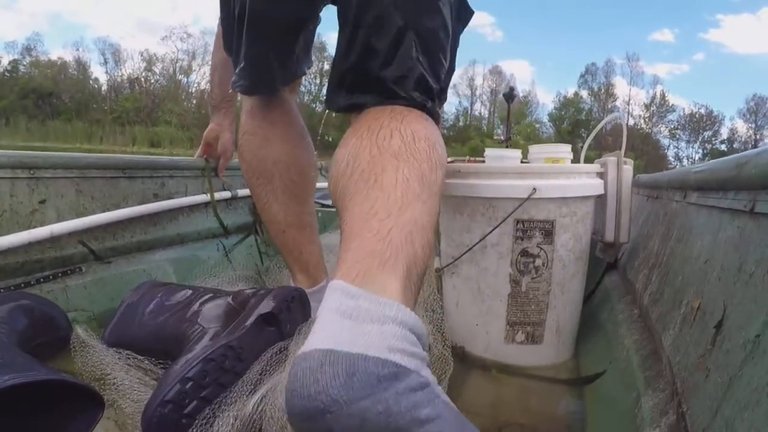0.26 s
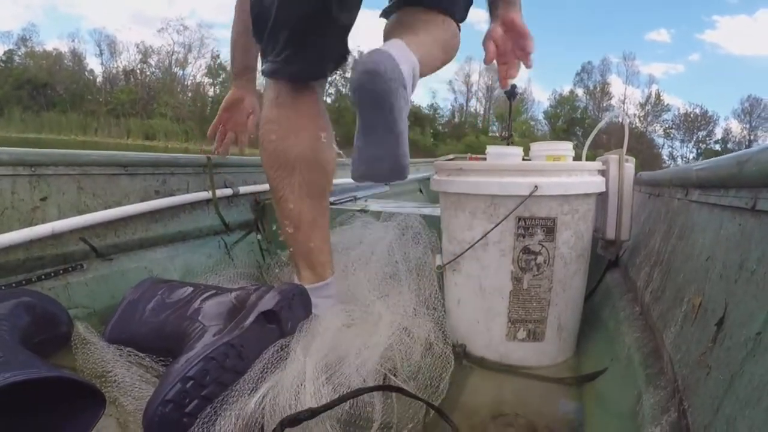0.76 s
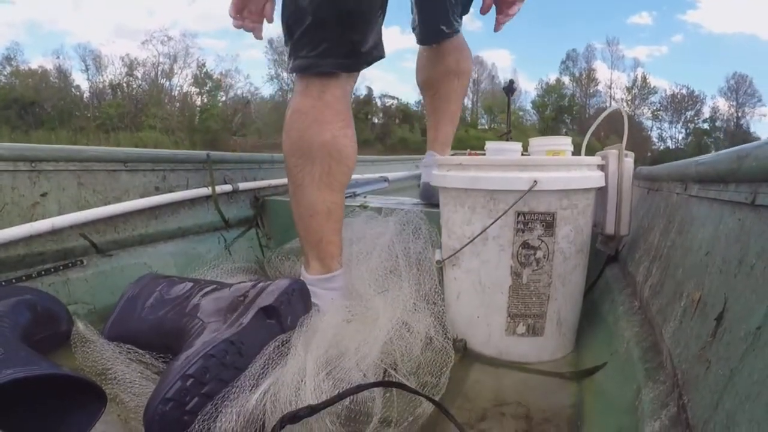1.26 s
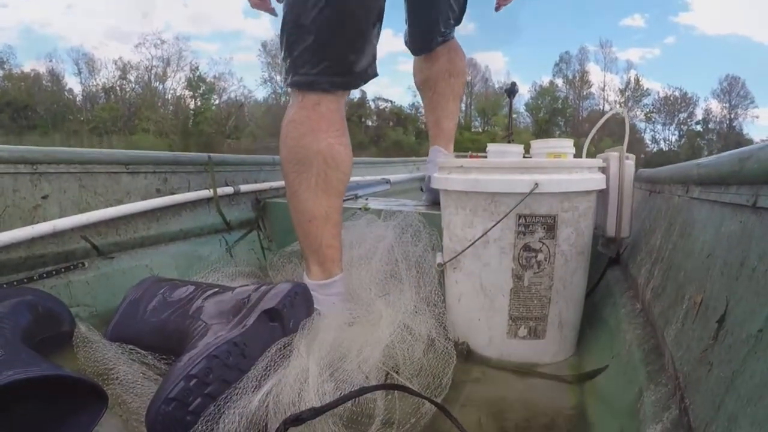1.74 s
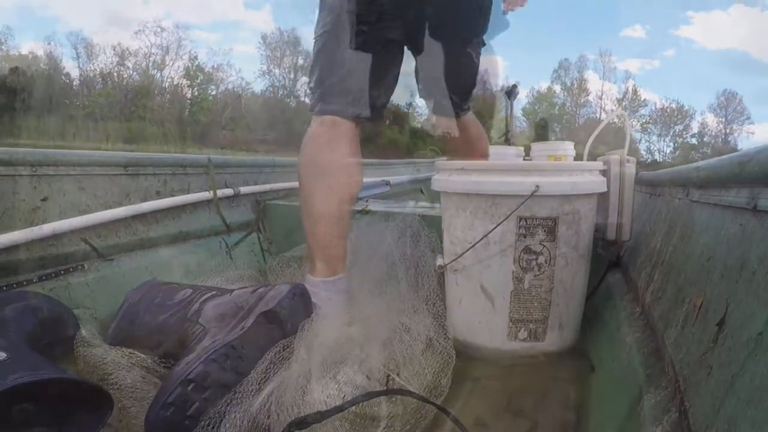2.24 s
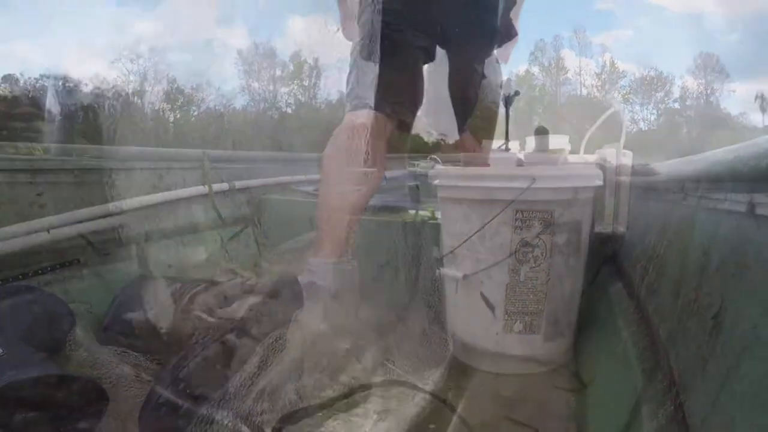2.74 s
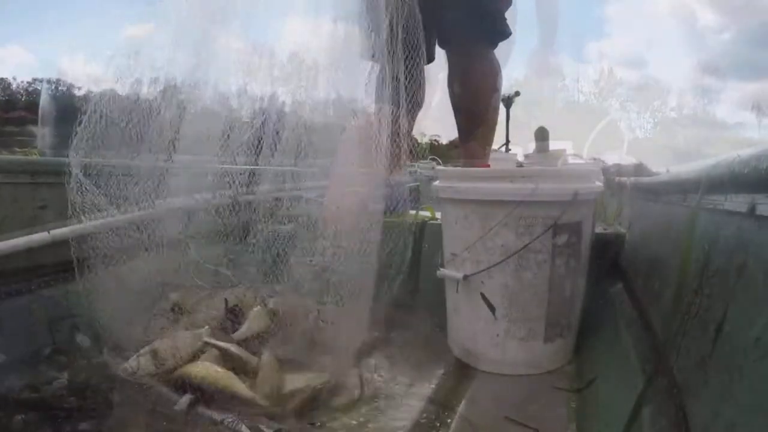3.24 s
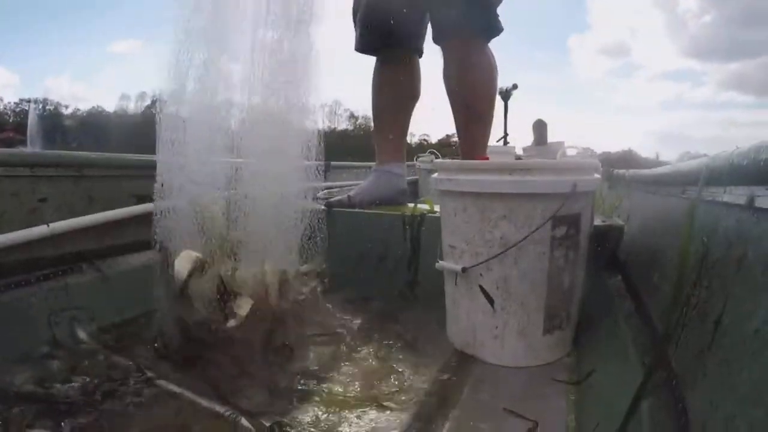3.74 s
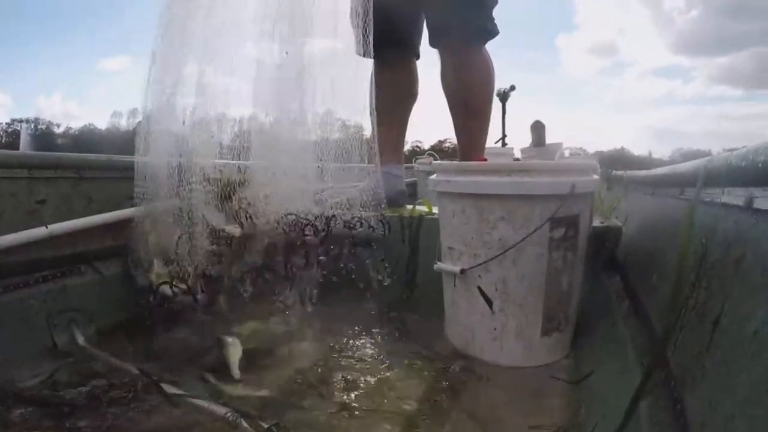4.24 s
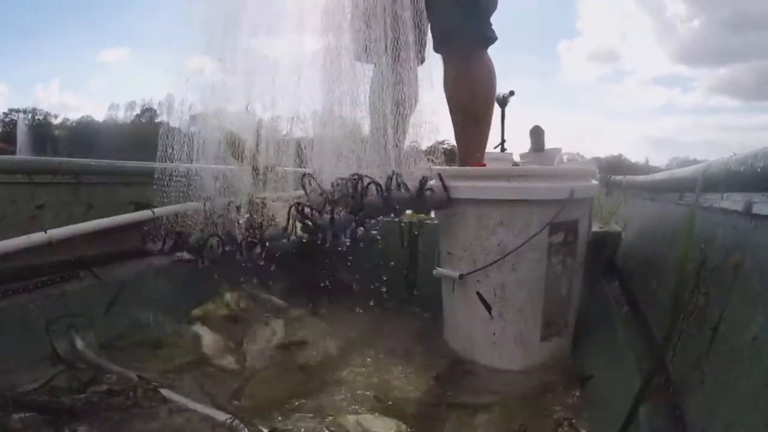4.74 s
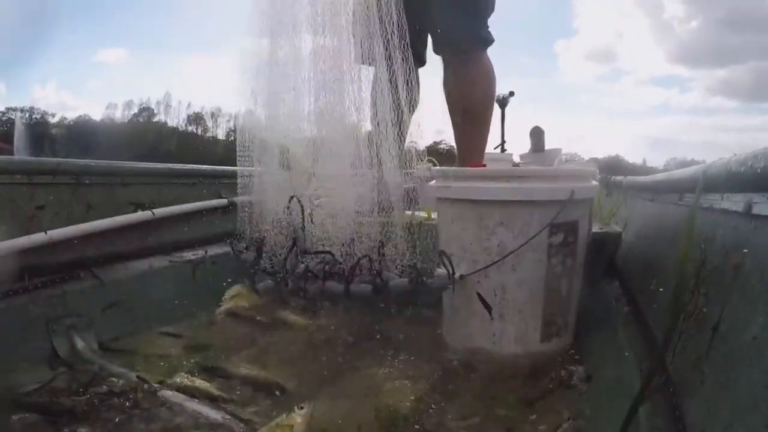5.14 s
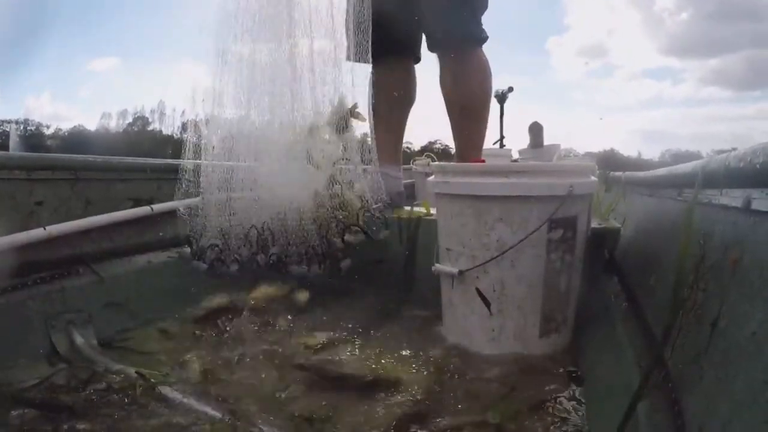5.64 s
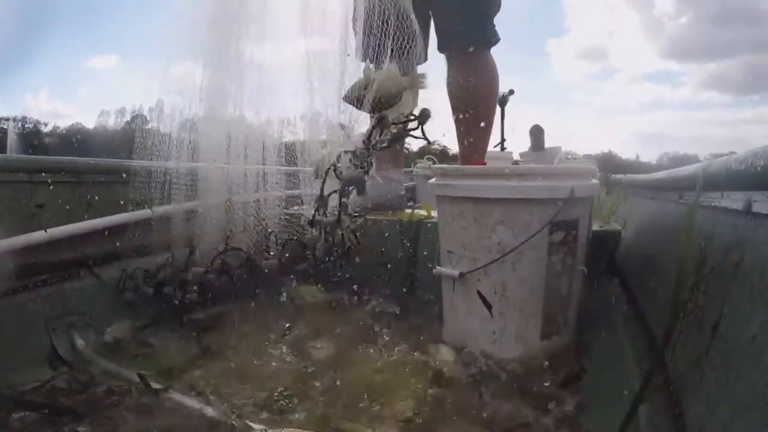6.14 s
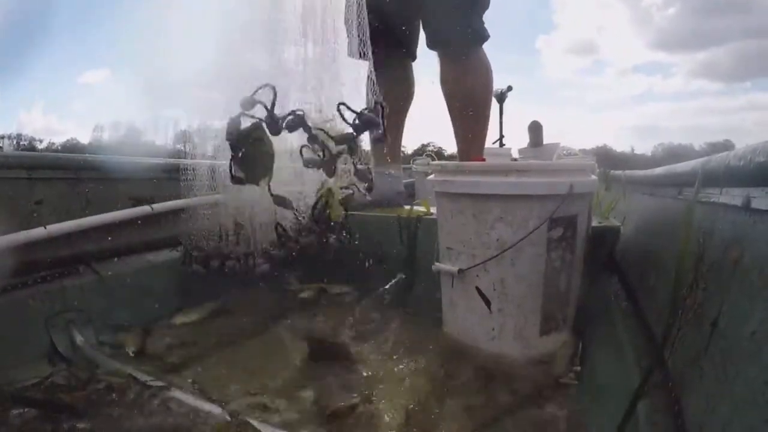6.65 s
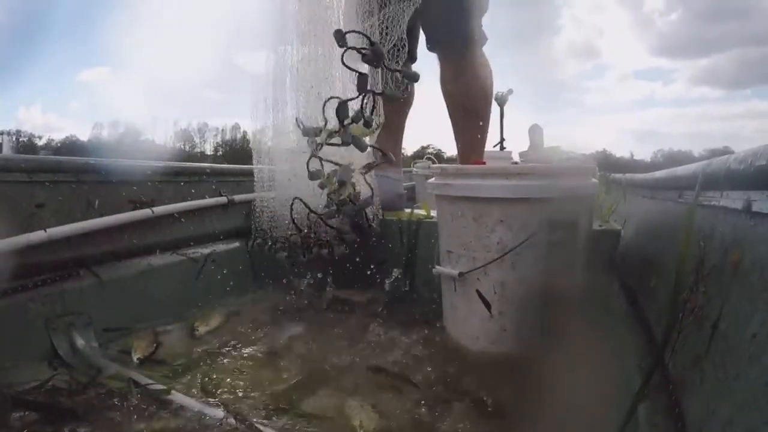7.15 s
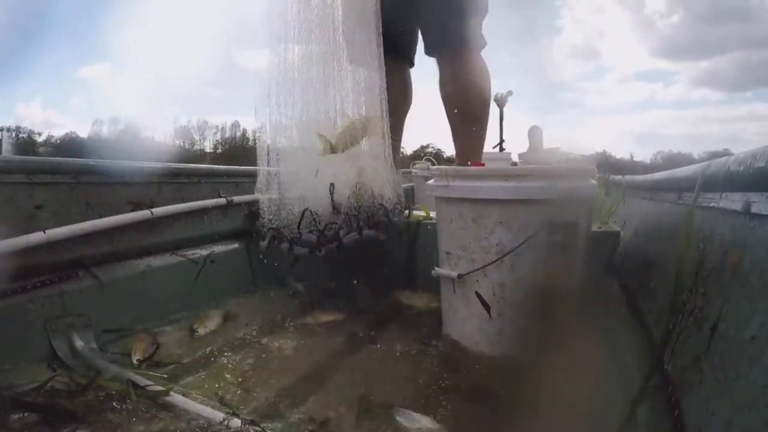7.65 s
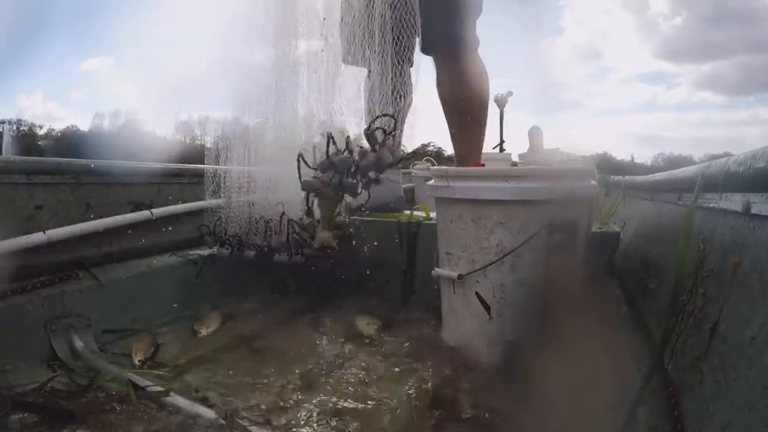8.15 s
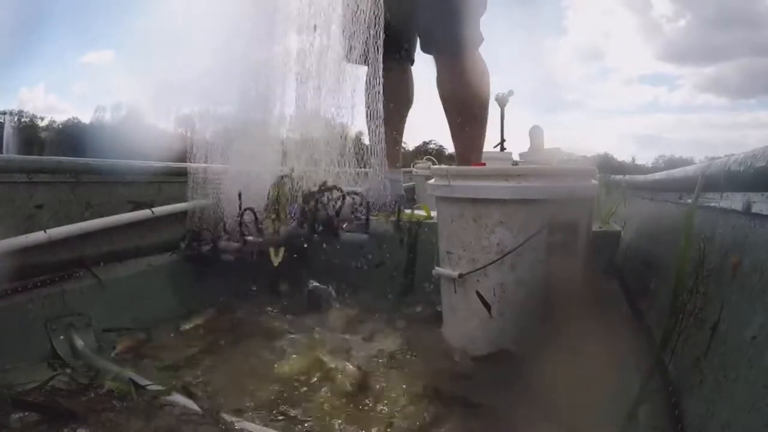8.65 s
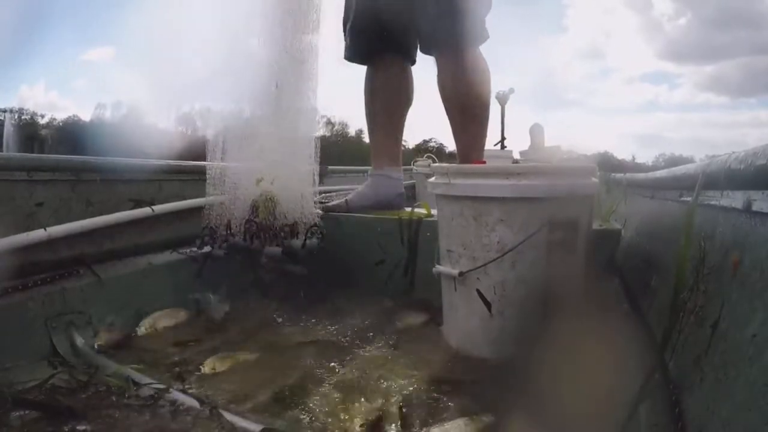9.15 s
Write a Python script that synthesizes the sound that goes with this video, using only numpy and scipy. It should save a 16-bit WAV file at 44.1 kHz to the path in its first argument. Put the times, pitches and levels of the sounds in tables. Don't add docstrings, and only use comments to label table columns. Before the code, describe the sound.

Wet net shaken in a small metal boat: lead weights and fish knock the hull, slap bilge water, and spray drips over a light breeze.

```python
import sys
import numpy as np
from scipy import signal
from scipy.fft import rfft, irfft, next_fast_len
from scipy.io import wavfile

SR = 44100
rng = np.random.default_rng(int(sys.argv[2]) if len(sys.argv) > 2 else 0)


def master(y):
    cut = np.clip(np.atleast_2d(y).T, -1, 1)
    pcm = np.round(cut * 32767)
    wavfile.write(sys.argv[1], SR, pcm.astype(np.int16))


def makeup_ratio(level_db):
    decades = np.asarray(level_db, float) / 20
    return 10 ** decades


N = 414099


def in_time(rows):
    s, *columns = np.transpose(rows)
    return [np.interp(np.arange(N) / SR, s, c, left=c[0], right=c[-1]) for c in columns]


def rms_one(x):
    return x / np.sqrt(np.mean(x ** 2) + 1e-20)


def colour(x, spectrum):
    size = next_fast_len(N)
    hz = np.maximum(np.arange(size // 2 + 1) * SR / size, 1)
    point_hz, point_db = np.transpose(spectrum)
    gain = makeup_ratio(np.interp(np.log(hz), np.log(point_hz), point_db))
    return rms_one(irfft(rfft(x, size) * gain, size)[:N])


def band(x, low_hz, high_hz):
    return rms_one(signal.sosfilt(signal.butter(2, [low_hz, high_hz], "band", fs=SR, output="sos"), x))


def muffle(x):
    return signal.sosfilt(signal.butter(3, 6800, fs=SR, output="sos"), x)


def drift(rate):
    every, warm_up = 40, 2000
    r = np.exp(-2 * np.pi * rate * every / SR)
    chance = rng.standard_normal(N // every + warm_up + 2)
    slow = signal.lfilter([1], [1, -2 * r, r * r], chance)[warm_up:]
    return np.interp(np.arange(N) / every, np.arange(len(slow)), rms_one(slow))


def ring(clicks, hz, t60):
    r, w = makeup_ratio(-60 / (t60 * SR)), 2 * np.pi * hz / SR
    return signal.lfilter([0, np.sin(w)], [1, -2 * r * np.cos(w), r * r], clicks + 1e-18)


def strikes(seconds, level_db):
    clicks = np.zeros(N)
    clicks[np.minimum((np.asarray(seconds) * SR).astype(int), N - 1)] = makeup_ratio(level_db)
    return clicks


def burst(clicks, rise_s, t60):
    up, down = np.exp(-1 / (rise_s * SR)), makeup_ratio(-60 / (t60 * SR))
    return signal.lfilter([1 - up], np.convolve([1, -up], [1, -down]), clicks + 1e-18)


def spells(rows, edge_s):
    t, level = np.arange(N) / SR, 0
    for s, length, db in rows:
        corners = s + np.array([-0.22, 0.68, -0.62, 0.22]) * edge_s + [0, 0, length, length]
        level = level + makeup_ratio(db) * np.interp(t, corners, [0, 1, 1, 0])
    return level


def grains(per_s, spread_db):
    sizes = makeup_ratio(spread_db * np.minimum(rng.exponential(1, N), 5)) * rng.choice([-1, 1], N)
    return sizes * (rng.random(N) < per_s / SR)


def droplets(per_s, spread_db, low_hz, high_hz, cycles):
    clicks, dealt = grains(per_s, spread_db), rng.integers(0, 10, N)
    out = np.zeros(N)
    for k, hz in enumerate(np.geomspace(low_hz, high_hz, 10)):
        once = ring(clicks * (dealt == k), hz, cycles / hz)
        out += hz * ring(once, hz, cycles / hz)
    return rms_one(out)


def bubbles(count, spread_db):
    out, longest = np.zeros(N), np.arange(int(.03 * SR)) / SR
    for when, pitch, size, climb in rng.random((count, 4)):
        at, hz = int(when * (N - len(longest))), 650 * 8.5 ** pitch
        t = longest[:int(24 * SR / hz)]
        life = t * hz / 25.1
        chirp = np.sin(2 * np.pi * hz * t * (1 + 0.26 * climb * life))
        out[at:at + len(t)] += makeup_ratio(-spread_db * np.log(size + 0.034)) * chirp * life * makeup_ratio(-60 * life)
    return rms_one(out)


def wet_noise():
    # frequency in Hz, density in dB per Hz.
    through_housing = [(350, 9), (600, -4.5), (907, -10.5), (996, -6.5), (1370, -4.5), (1670, 1),
                       (3150, -16), (4050, -10), (5060, -12), (6180, -11.5), (7060, -23.5), (8400, -26.5),
                       (14500, -63)]
    spatter = rng.standard_normal(N)
    return colour(spatter * np.abs(spatter) ** 0.8, through_housing)


def patchy(noise, low_hz, high_hz, gush, own_db, rate):
    edges = np.geomspace(low_hz, high_hz, 5)
    out = np.zeros(N)
    for k, pair in enumerate(zip(edges, edges[1:])):
        part = signal.sosfilt(signal.butter(2, pair, "band", fs=SR, output="sos"), noise)
        out += part * (-1) ** k * makeup_ratio(gush + own_db * drift(rate))
    return rms_one(out)


def splash(rows, noise, body_hz, body_t60, gain_db):
    s, peak_db, body_db, hz = np.transpose(rows)
    grit = makeup_ratio(5.0 * drift(160))
    spray = burst(strikes(s, peak_db - 5.0), 0.0024, 0.049)
    spray += burst(strikes(s, peak_db - 23.0), 0.006, 0.32)
    out = band(noise, body_hz, 2730) * burst(strikes(s, peak_db + body_db + gain_db), 0.0042, body_t60)
    out += band(noise, 1760, 10000) * grit * spray
    t = np.arange(int(0.031 * SR)) / SR
    puffs = rng.standard_normal((len(s), len(t)))
    fizz = np.zeros(N)
    for at, level_db, pitch, puff in zip((s * SR).astype(int), peak_db, hz, puffs):
        pitched = ring(puff * makeup_ratio(-60 * t / 0.06), pitch, 0.0054)
        fizz[at:at + len(t)] += makeup_ratio(level_db - 16.5) * pitched[:N - at]
    return out + muffle(fizz)


def breeze():
    # frequency in Hz, density in dB per Hz.
    air_spectrum = [(88, -16), (150, -4.5), (278, -18), (337, -19.5), (742, -26.5), (1730, -33.5),
                    (3400, -48.5), (4720, -45.5), (10000, -50), (12900, -54), (15000, -73)]
    # time in seconds, level in dB.
    gusts = [(0, -33), (1.1, -34), (1.3, -37), (2.3, -34), (2.7, -46), (3.4, -35), (4, -33), (6.5, -38),
             (8, -33), (8.6, -36.5), (9.39, -37.5)]
    flutter_db = 1.6 * drift(13)
    air = colour(rng.standard_normal(N), air_spectrum)
    wetted = .65 * np.clip(np.arange(N) / SR - 2.2, 0, 1)
    return makeup_ratio(in_time(gusts)[0] + flutter_db) * (air + wetted * (muffle(air) - air))


def rumble():
    # frequency in Hz, density in dB per Hz.
    shudder = [(11, -33), (18, -9.5), (38, 0.5), (75, -2.5), (135, -9), (256, -24.5), (363, -11),
               (406, -35), (500, -25.5), (650, -67), (1100, -120)]
    # start in seconds, peak in dB.
    steps = [
        (0.572, -13.5),
        (.64, -23),
        (1.056, -7.5),
        (1.128, -21.5),
    ]
    # start in seconds, peak in dB.
    lurches = [
        (.01, -26.5),
        (.69, -23.5),
        (2.26, -14.5),
        (3.95, -28),
        (5.6, -18),
        (6.8, -22),
        (7.13, -22.5),
        (8.1, -22),
    ]
    level = makeup_ratio(-36.5)
    level = level + burst(strikes(*np.transpose(steps)), rise_s=0.0054, t60=0.52)
    level = level + burst(strikes(*np.transpose(lurches)), rise_s=0.089, t60=1.0)
    low_pass = signal.butter(1, 110, fs=SR, output="sos")
    heave = signal.sosfilt(low_pass, colour(rng.standard_normal(N), shudder))
    return level * makeup_ratio(2.4 * drift(10.4) + 2.0) * heave


def runoff(wet, froth, slosh_db):
    t = np.arange(N) / SR
    net_up = np.clip(t - 2, 0, 1)
    spray_db = slosh_db - 4 - 5 * (t < 3)
    gush = net_up * drift(35)
    slosh = patchy(wet, 496, 2470, 2.3 * gush, own_db=4.0, rate=36) + makeup_ratio(-1.0) * net_up * froth
    fizz = droplets(900, 4.2, 3190, 6740, cycles=18.0)
    spray = patchy(wet, 2200, 21000, 2.8 * gush, own_db=4.5, rate=44) + makeup_ratio(-7.0) * net_up * fizz
    return makeup_ratio(slosh_db - 7.5) * slosh + makeup_ratio(spray_db - 6.5) * spray


def housing_ticks():
    # start in seconds, peak in dB.
    ticks = [(0.2074, -24), (0.5477, -33), (0.6647, -31.5), (0.9282, -37), (1.594, -38), (2.233, -36),
             (2.305, -33), (3.569, -32), (3.9654, -30), (4.0133, -36), (4.1669, -37), (4.2482, -28),
             (4.3106, -30), (4.7047, -35), (4.903, -32), (5.545, -31), (5.611, -32), (5.6376, -34),
             (5.9409, -27), (6.3684, -29), (6.47, -37), (6.486, -31), (6.5266, -34), (7.0594, -33),
             (7.3432, -27), (7.506, -26), (8.848, -28), (9.0394, -26), (5.2799, -27), (5.4959, -27),
             (4.725, -25), (5.8601, -26), (6.017, -17.5), (6.915, -30), (7.202, -18), (7.3054, -31),
             (7.9763, -34), (8.0232, -29), (7.226, -32), (8.1295, -22), (8.1923, -23), (8.2287, -30),
             (8.2447, -27), (8.3115, -33), (6.94, -28), (8.9406, -37), (9.186, -26)]
    s, peak_db = np.transpose(ticks)
    return band(rng.standard_normal(N), 4100, 8200) * burst(strikes(s, peak_db - 7.0), 0.00039, 0.027)


def scuffs():
    # start in seconds, peak in dB, body over the peak in dB, pitch in Hz.
    scrapes = [(0.2084, -29, -10, 7300), (0.302, -38.5, 5, 4440), (0.429, -34.5, -8, 6400),
               (0.551, -37.5, 0, 5000), (0.5794, -40, 5, 4660), (0.6237, -44.5, 16, 4430),
               (0.934, -38, -9, 5080), (0.955, -32, 8.5, 4300), (1.064, -33.5, 9, 4800),
               (1.088, -39, 16.5, 4510), (1.1246, -34.5, 11.5, 4600), (1.798, -50, 17.5, 4050),
               (1.938, -44, 6, 4930), (2.0466, -51, 22.5, 3900), (2.262, -27, -4, 5000)]
    # frequency in Hz, density in dB per Hz.
    empty_hull = [(240, -49), (400, -3), (1150, -12.5), (1670, -19), (2350, -21), (3360, -39),
                  (4730, -23.5), (7170, -39), (14000, -47)]
    dry_noise = colour(rng.standard_normal(N), empty_hull)
    return splash(scrapes, dry_noise, body_hz=467, body_t60=0.099, gain_db=1.5)


def booms():
    # time of the peak in seconds, peak in dB, pitch in Hz.
    plate_booms = [(2.327, -7, 388), (2.522, -6, 134), (2.483, -18, 376), (2.587, -17, 485),
                   (2.77, -10, 258), (2.802, -10, 148), (2.809, -16, 368), (3.03, -14.5, 182),
                   (3.645, -20.5, 533), (3.442, -17, 210), (3.445, -15.5, 304), (3.976, -10, 550),
                   (3.983, -7.5, 196), (4.04, -5.5, 164), (4.096, -15, 567), (4.156, -16, 480),
                   (4.158, -17, 204), (4.18, -9, 205), (4.337, -5.5, 178), (4.369, -4.5, 311),
                   (4.377, -9, 130), (4.399, -7.5, 160), (4.434, -7.5, 160), (4.62, -9, 148),
                   (4.642, -9.5, 187), (4.747, -9, 237), (7.001, -17, 279), (4.833, -2.5, 222),
                   (4.898, -5.5, 242), (4.941, -6.5, 214), (4.97, -14, 208), (6.537, -25, 417),
                   (5.65, -14, 393), (5.663, -2, 213), (5.718, -11.5, 486), (5.74, -5.5, 230),
                   (5.773, -7, 229), (5.798, -7.5, 396), (5.824, -7.5, 136), (5.846, -10, 362),
                   (6.035, -18, 430), (5.882, -5, 154), (5.959, -13.5, 410), (6.085, -6.5, 549),
                   (6.089, -5.5, 229), (2.38, -12, 165), (6.131, -14, 526), (6.135, -8, 181),
                   (6.832, -15, 170), (7.049, -3, 218), (7.05, -12.5, 562), (7.2, -11, 196),
                   (7.289, -12, 226), (8.716, -21, 537), (8.243, -15, 330), (8.25, -10.5, 138),
                   (8.272, -18, 226), (8.3, -13, 200), (8.935, -4, 196), (8.972, -17, 340)]
    # time of the peak in seconds, peak in dB, pitch in Hz.
    flexes = [
        (0.596, -7, 74),
        (.655, -8, 42),
        (.71, -8, 62.5),
        (1.085, -13, 81),
        (1.144, -7, 49),
        (1.125, -10, 140),
        (2.2, -14.5, 60.5),
    ]
    rows = [*plate_booms, *flexes]
    out, t = np.zeros(N), np.arange(-int(.1 * SR), int(.1 * SR)) / SR
    side_s = np.where(t < 0, 0.0099, 0.0095)
    for (peak_s, level_db, hz), turn in zip(rows, rng.random(len(rows))):
        at = int((peak_s + t[0]) * SR)
        swell = np.exp(-.5 * (t / side_s / max(1, 130 / hz)) ** 2)
        out[at:at + len(t)] += makeup_ratio(level_db - 4.5) * swell * np.sin(2 * np.pi * (hz * t + turn))
    return out


def hull(rattle_db):
    # start in seconds, peak in dB, hardness in
    # dB, pitch of the struck plate in Hz.
    knocks = [(0.598, -10, -8, 377), (2.295, -13, 0.5, 400), (2.579, -24, 4, 181), (2.765, -3.5, -9, 264),
              (3.019, -11.5, -14, 187), (3.43, -9, -11, 204), (3.768, -29, 9, 480), (3.973, -2, -7, 180),
              (4.032, -7.5, -14, 162), (4.15, 2.5, -12, 228), (4.358, 0.5, -9, 320), (4.741, -10, -13, 229),
              (4.828, -6.5, -26, 229), (4.888, -2.5, -5, 234), (4.961, -6, -12, 230),
              (5.051, -5.5, -9, 424), (5.634, -5.5, -2, 199), (5.716, -8, 0.5, 202), (5.8, -14, -4, 330),
              (5.87, -9, -7, 400), (6.079, -6.5, -4.5, 231), (6.127, -13.5, -5, 161),
              (6.818, -2.5, -16, 185), (7.037, -7, -8, 224), (7.192, -15, -8, 191), (7.28, -12, -27, 228),
              (7.963, -13.5, -7.5, 177), (8.246, -2.5, -7, 138), (8.918, -7.5, -4.5, 196),
              (9.028, -12.5, -17, 324)]
    # start in seconds, peak in dB,
    # pitch of the struck plate in Hz.
    thuds = [(1.067, -5.5, 171), (1.893, -27, 191), (2.051, -17.5, 200), (2.508, -2, 137), (4.605, -7, 141),
             (5.326, -12, 212), (5.49, -15, 180), (5.57, -15, 199), (5.948, -4, 147), (6.385, -11, 227),
             (6.671, -10.5, 161), (6.973, -4.5, 153), (7.104, -7, 158), (7.411, -11, 228), (8.01, -10, 229),
             (8.376, -11, 159), (8.59, -9.5, 162), (9.248, -11, 162)]
    # frequency in Hz, level in dB, t60 in seconds.
    plates = [(104.7, -10, 0.31), (141, -7.5, 0.43), (163.95, -6.5, 0.53), (196, 3.5, 0.093),
              (231, -1, 0.14), (313.5, -9, 0.15), (335, -3.5, 0.074), (399, -6, 0.11), (479.4, -3.5, 0.058),
              (561, -9, 0.056), (671, -25.5, 0.096), (770, -17.5, 0.07)]
    soft_db = -38
    blows = [*knocks, *[(s, db, soft_db, hz) for s, db, hz in thuds]]
    s, peak_db, hard_db, struck_hz = np.transpose(blows)
    clumps = makeup_ratio(rattle_db + 3.9 * drift(26.5))
    luck_db = rng.normal(0, 1.0, (len(s), len(plates)))
    out = np.zeros(N)
    for k, (hz, mode_db, t60) in enumerate(plates):
        tilt_db = (hard_db + 17.0) * np.clip(np.log2(hz / 230), 0, 1)
        near_db = 7 * np.exp(-(np.log2(hz / struck_hz) / 0.23) ** 2)
        blow_db = peak_db + tilt_db + near_db + luck_db[:, k] - 43.0
        contact = burst(strikes(s - .006, blow_db), 0.0025, 0.25)
        force = rng.standard_normal(N) * (contact + makeup_ratio(-36.0) * clumps)
        out += makeup_ratio(mode_db) * ring(force, hz, t60)
    return out


def plops(wet):
    # start in seconds, peak in dB, pitch in Hz.
    flops = [(2.753, -8.5, 1670), (3.954, -4, 1510), (4.079, -3.5, 660), (4.114, -5, 940), (4.149, -9, 670),
             (4.179, -5, 760), (4.277, -7.5, 1520), (4.357, -5, 885), (4.739, -12, 910), (4.82, -3, 894),
             (4.888, -3, 800), (5.052, -11, 870), (5.468, -17, 2130), (5.64, -0.5, 850), (5.714, -3, 735),
             (5.754, -3.5, 844), (5.412, -20, 2100), (6.063, -2.5, 1013), (6.22, -16, 1870),
             (6.923, -7, 1765), (7.027, -3, 970), (7.46, -18, 1590), (7.746, -13, 1540), (8.14, -8, 924),
             (8.233, -1.5, 1745), (8.304, -3, 870), (8.483, -12, 1540), (8.846, -16, 840),
             (9.039, -16.5, 1950), (9.123, -20, 1620)]
    # start in seconds, peak in dB, pitch in Hz.
    drips = [(1.794, -25.5, 1670), (2.262, -19, 1446), (2.477, -15, 1450), (2.587, -12, 1150),
             (3.285, -24, 2100), (3.415, -11, 2300), (6.19, -26, 2460), (6.682, -23, 1740),
             (6.962, -12, 2200), (7.072, -14, 2060), (8.049, -21, 1850)]
    s, peak_db, _ = np.transpose(flops)
    out = wet * burst(strikes(s, peak_db - 14.5), 0.0019, 0.037)
    rows = [*flops, *drips]
    t = np.arange(int(.08 * SR)) / SR
    noise = rng.standard_normal((len(rows), len(t)))
    for (start, level_db, hz), puff in zip(rows, noise):
        at = int(start * SR)
        bubble = np.sin(2 * np.pi * hz * (t + 2.0 * t * t)) * makeup_ratio(-60 * t / 0.069 - 11.5)
        smack = np.sin(2 * np.pi * hz * t) * makeup_ratio(-60 * t / 0.0053 - 7.5)
        gush = ring(puff * makeup_ratio(-60 * t / 0.12 - 17), hz, 0.0027)
        plop = makeup_ratio(level_db) * (bubble + gush + smack) * np.minimum(t / 0.00029, 1)
        out[at:at + len(t)] += plop[:N - at]
    return out


def blips():
    # time of the peak in seconds, peak in dB, pitch in Hz.
    drops = [(2.132, -30, 3880), (2.223, -20, 1610), (3.395, -18, 650), (3.065, -25, 5600),
             (3.773, -19, 1270), (3.454, -15, 1100), (3.54, -19.5, 5520), (3.584, -17, 4110),
             (3.706, -25, 2890), (3.878, -19, 4630), (4.154, -9, 1560), (4.279, -5, 1540),
             (4.511, -19.5, 1520), (4.56, -20, 6000), (4.609, -17.5, 835), (4.68, -17, 2150),
             (4.74, -20, 855), (4.771, -12, 3660), (4.782, -21, 3640), (4.871, -13, 920),
             (4.948, -14, 5450), (5.333, -17.5, 746), (5.347, -18, 2030), (5.522, -17, 1620),
             (5.556, -15, 1150), (5.576, -15.5, 844), (5.639, -6, 3880), (5.717, -5, 1590),
             (5.843, -6.5, 845), (5.87, -8, 3030), (5.91, -16, 5530), (5.909, -18, 2600),
             (5.571, -17, 3860), (6.298, -15, 1280), (6.31, -17, 1240), (6.347, -17, 5770),
             (6.712, -20, 3880), (6.781, -14.5, 3100), (6.849, -15, 1380), (6.937, -18, 1080),
             (7.0, -15, 915), (7.19, -9, 780), (7.203, -14, 5460), (7.507, -17.5, 820), (7.712, -19, 4610),
             (7.798, -15.5, 1980), (7.963, -17, 1130), (8.132, -11, 1180), (8.187, -10, 1240),
             (8.263, -9, 870), (8.272, -12, 856), (8.308, -8, 1870), (8.327, -17, 6130), (8.487, -20, 760),
             (8.494, -16.5, 5570), (8.61, -21, 3880), (8.722, -26, 700), (8.806, -16, 3850),
             (8.668, -16, 2240), (9.159, -18, 2030)]
    rise_s = .0015
    out, t = np.zeros(N), np.arange(int(0.037 * SR)) / SR
    for (peak_s, level_db, hz), puff in zip(drops, rng.standard_normal((len(drops), len(t)))):
        at = int((peak_s - 2 * rise_s) * SR)
        life = t * np.sqrt(2000 * hz) / 55
        chirp = np.sin(2 * np.pi * hz * t * (1 + 0.1 * life)) * makeup_ratio(-60 * life)
        hiss = makeup_ratio(-10) * rms_one(ring(puff, hz, 11.0 / hz)) * makeup_ratio(-30.0 * life)
        out[at:at + len(t)] += makeup_ratio(level_db - 4) * np.minimum(t / rise_s, 1) * (chirp + hiss)
    return out


def pours(wet, froth):
    # start in seconds, length in seconds, level in dB.
    sheets = [
        (2.19, 0.058, -35),
        (3.2, 0.063, -57),
        (3.66, 0.23, -34),
        (3.97, 0.27, -37),
        (4.33, 0.12, -33),
        (5.71, 0.17, -37),
        (6.9, 0.095, -35),
        (8.14, 0.21, -25.5),
        (8.55, 0.19, -40),
    ]
    return spells(sheets, edge_s=0.026) * (band(wet, 230, 8500) + makeup_ratio(-6) * froth)


def slaps(wet, froth):
    # start in seconds, peak of the spray in dB, spray pitch in Hz.
    flat_fish = [(2.58, -26, 3840), (2.751, -18, 3870), (3.417, -22, 2620), (3.812, -22.5, 4000),
                 (3.952, -15, 4000), (3.9628, -16, 4060), (4.1112, -18.5, 4360), (4.149, -20.5, 4300),
                 (4.167, -13.5, 4250), (4.3146, -19, 4500), (4.3537, -24, 5340), (5.7136, -17, 4000),
                 (5.7736, -14.5, 2860), (5.799, -18.5, 2820), (6.0608, -17.5, 4040), (6.124, -23, 4300),
                 (6.331, -26.5, 6040), (7.167, -23, 4100), (7.1864, -21, 3930), (7.533, -27.5, 2640),
                 (4.617, -36, 3900), (6.877, -33, 2500), (8.1275, -21.5, 4400), (8.742, -27.5, 3280)]
    # start in seconds, peak of the spray in dB, spray pitch in Hz.
    flicks = [(3.0123, -24.5, 3800), (3.382, -22.5, 2780), (4.248, -20.5, 3830), (4.407, -22.5, 4440),
              (4.702, -16, 4100), (4.798, -14, 3340), (4.8885, -25, 4200), (5.494, -19, 3400),
              (5.6354, -17, 3840), (5.8595, -8.5, 5900), (6.014, -13.5, 4900), (6.141, -19, 4570),
              (6.528, -25.5, 4150), (6.964, -20.5, 2600), (7.027, -15, 3120), (7.507, -16, 4000),
              (7.967, -17.5, 6050), (8.631, -25.5, 3160), (9.0378, -23, 3700), (9.184, -20, 4000)]
    # start in seconds, peak in dB.
    spurts = [(2.424, -31.5), (2.63, -26.5), (2.828, -30), (2.906, -31.5), (3.234, -32.5), (3.5372, -21),
              (3.899, -29), (4.2705, -19.5), (4.481, -39), (4.768, -26), (4.7815, -18), (4.818, -22.5),
              (5.1028, -20), (5.2772, -20), (5.349, -24.5), (5.3997, -27), (5.471, -20.5), (5.9536, -21),
              (6.2317, -23), (6.366, -25.5), (6.709, -32), (6.78, -22), (6.905, -20.5), (7.199, -21),
              (7.343, -22), (7.827, -28), (8.94, -19.5), (2.355, -33.5), (9.261, -17), (9.278, -19)]
    slap_body_db, flick_body_db, spurt_body_db, spurt_hz = 5.5, -2, -29, 4000
    rows = [(s, db, slap_body_db, hz) for s, db, hz in flat_fish]
    rows += [(s, db, flick_body_db, hz) for s, db, hz in flicks]
    rows += [(s, db, spurt_body_db, spurt_hz) for s, db in spurts]
    return splash(rows, wet + makeup_ratio(-12) * froth, body_hz=472, body_t60=0.15, gain_db=-4.0)


def plinks():
    # start in seconds, peak in dB, pitch in Hz.
    clear_drops = [(3.169, -36, 3120), (3.633, -20.5, 1660), (6.724, -24.5, 587), (6.742, -24.5, 657),
                   (7.533, -21.5, 2330), (7.708, -18.5, 1910), (7.655, -30, 2400), (7.934, -30, 1300),
                   (2.68, -34, 1680), (6.188, -25, 2250), (6.845, -23.5, 2310), (9.008, -24, 2280),
                   (9.054, -20, 1180), (9.063, -25, 1885), (9.123, -25.5, 1560)]
    out, t = np.zeros(N), np.arange(int(.07 * SR)) / SR
    for start, level_db, hz in clear_drops:
        at, life = int(start * SR), t * hz / 22
        chirp = np.sin(2 * np.pi * hz * t * (1 + .15 * life))
        out[at:at + len(t)] += makeup_ratio(level_db + 31.5 - 60 * life) * life * chirp
    return out * (.6 + .6 * drift(180))


def port_sizzle():
    # start in seconds, length in seconds, level in dB.
    wet_port = [
        (7.96, .1, -52),
        (8.06, 0.077, -60),
        (8.13, .2, -48.5),
    ]
    hiss = band(band(rng.standard_normal(N), 13200, 18000), 11800, 18000)
    return spells(wet_port, edge_s=.025) * makeup_ratio(4.3 * drift(60)) * hiss


def scene():
    # time in seconds, shaking as hull rattle in dB, draining water in dB.
    motion = [(0, -34, -43), (1.39, -38.5, -44.5), (1.75, -27.5, -43.5), (2.55, -19, -31),
              (3.05, -32, -44.5), (3.35, -33.5, -40), (3.6, -23, -32.5), (4.21, -21.5, -33),
              (4.94, -23.5, -27), (5.3, -33.5, -36), (5.7, -16.5, -24), (6.1, -20.5, -33),
              (6.64, -28.5, -32), (6.96, -32.5, -27), (7.3, -19, -33), (7.6, -30.5, -35), (8.3, -25, -27),
              (9.39, -29, -34)]
    rattle_db, slosh_db = in_time(motion)
    wet = wet_noise()
    froth = bubbles(count=6500, spread_db=5.5)
    boat = rumble() + scuffs() + booms() + hull(rattle_db)
    water = runoff(wet, froth, slosh_db) + muffle(plops(wet)) + blips()
    water += pours(wet, froth) + slaps(wet, froth) + plinks()
    at_housing = breeze() + housing_ticks() + port_sizzle()
    return (boat + water + at_housing)[None]


def roll_off(x):
    return signal.sosfilt(signal.butter(12, 15500, fs=SR, output="sos"), x)


def record(dry):
    rounded = 1.12 * np.tanh(dry / 1.12)
    top_cut = signal.cheby2(8, 45, 16050, fs=SR, output="sos")
    mix = signal.sosfilt(top_cut, rounded)
    return roll_off(mix)


dry = scene()
out = record(dry)
master(out)
```